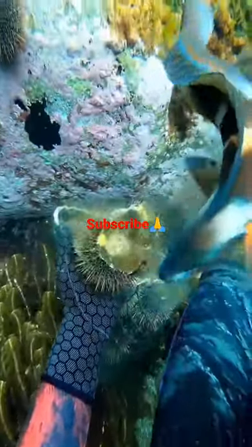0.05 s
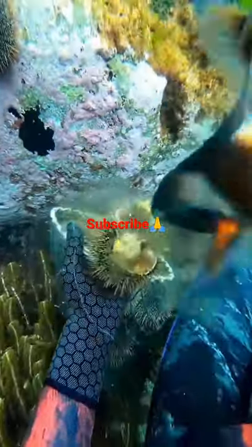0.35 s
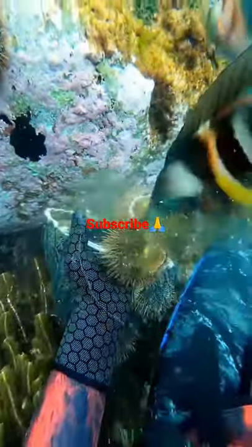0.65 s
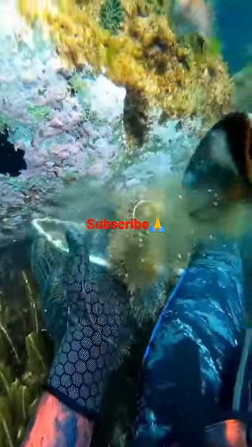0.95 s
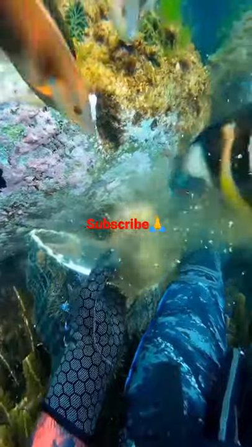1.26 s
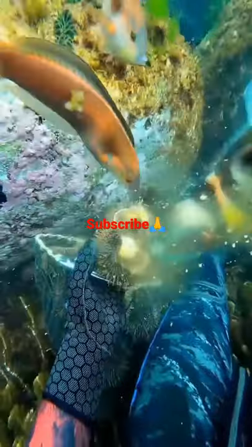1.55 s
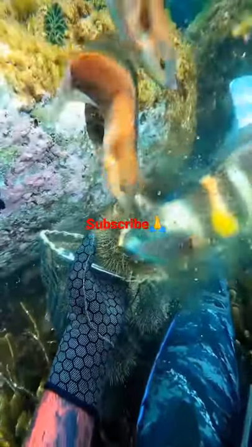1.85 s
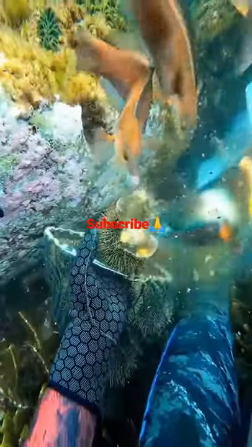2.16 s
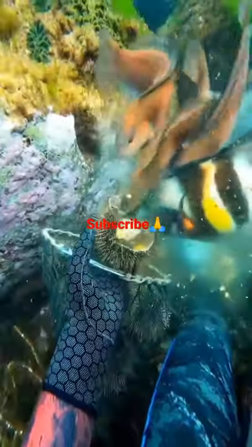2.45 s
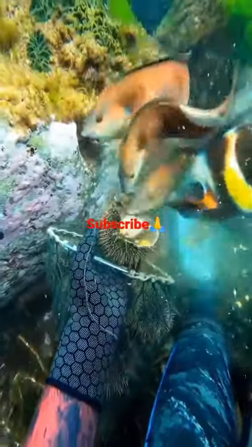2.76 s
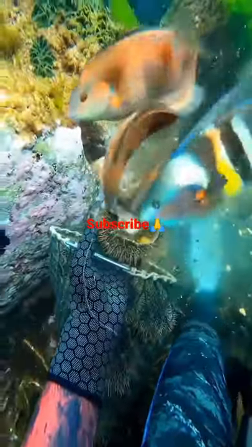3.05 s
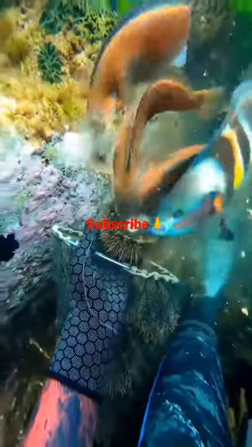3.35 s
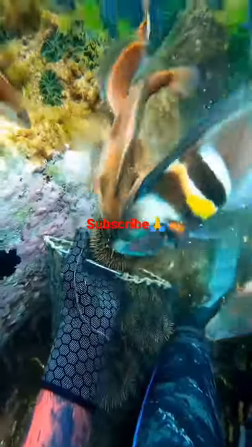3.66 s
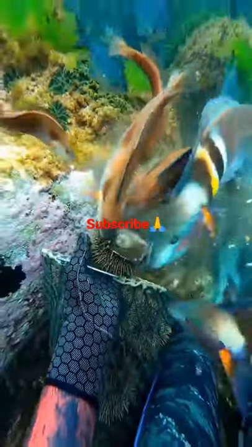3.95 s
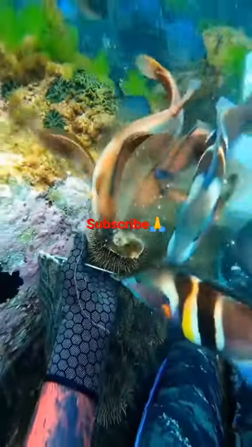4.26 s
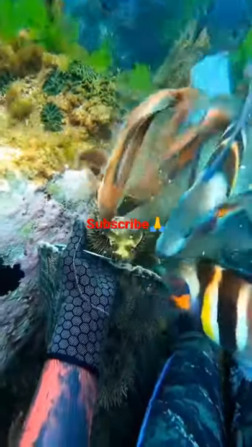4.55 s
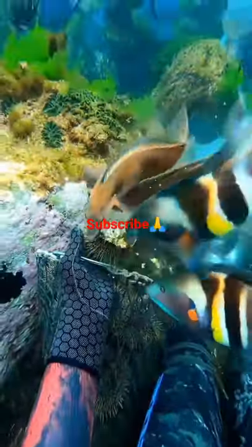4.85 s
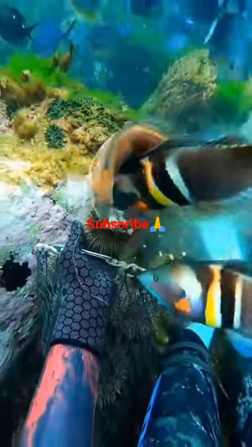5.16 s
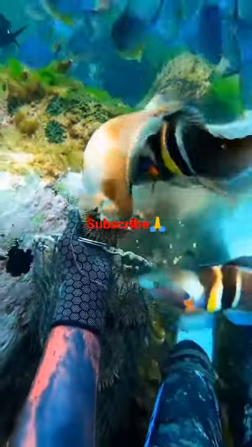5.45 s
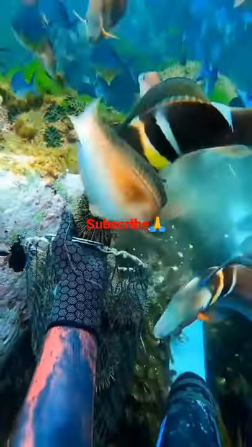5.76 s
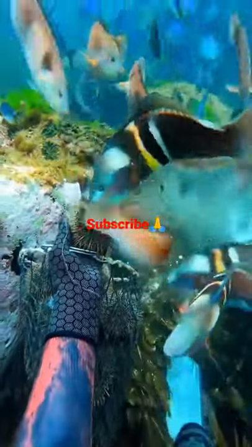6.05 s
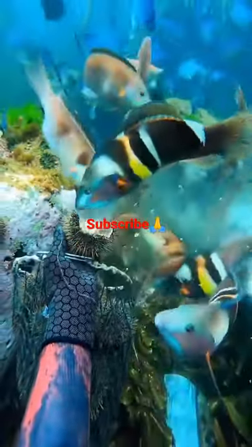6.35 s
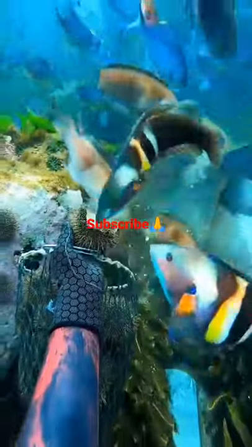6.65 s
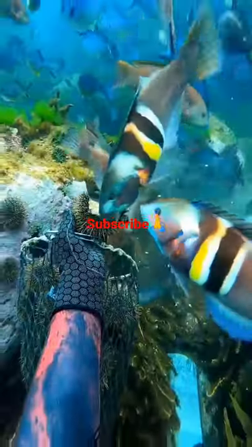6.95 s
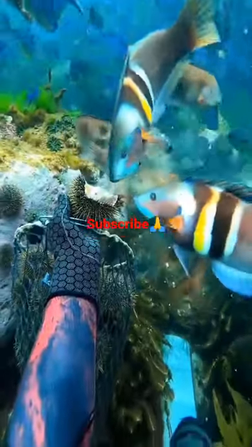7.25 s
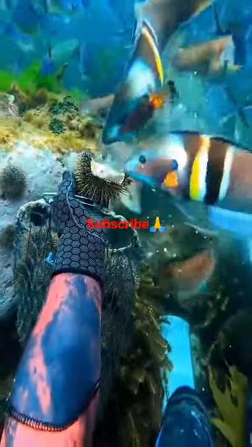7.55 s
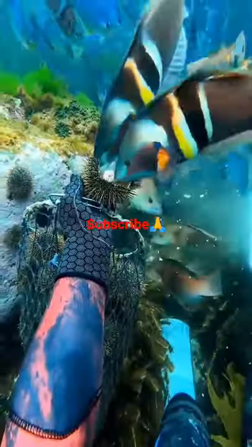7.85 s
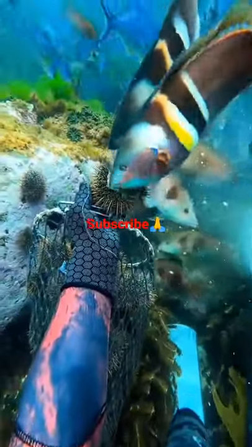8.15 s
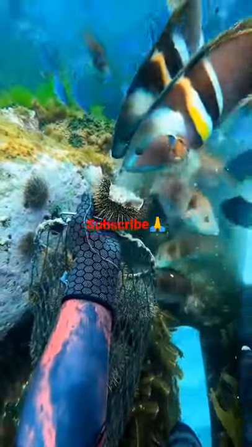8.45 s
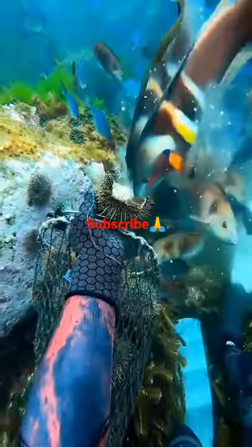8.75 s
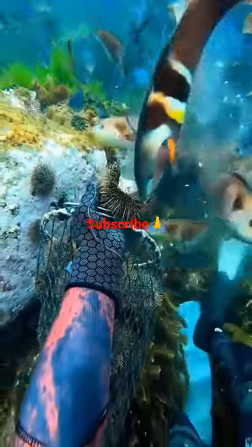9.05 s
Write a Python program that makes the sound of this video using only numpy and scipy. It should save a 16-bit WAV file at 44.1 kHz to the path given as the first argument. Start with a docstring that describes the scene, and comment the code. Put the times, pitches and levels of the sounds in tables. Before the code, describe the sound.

Underwater, sea urchin shell and spines click and crunch amid hollow knocks and soft thumps, over a low water rumble and faint crackle.

```python
"""Brittle clicks and crunches, hollow knocks and soft thumps sound under water, over a rumble and a crackle.
Wrasse crowd round a sea urchin that a diver has opened with a metal tool above a mesh bag.
Shell, spines and tool click by impact and crunch by brittle fracture; knocks and swirls excite
the damped modes of the camera housing. Moving water presses on the housing as a rumble,
and the countless tiny snaps of the reef add up to a crackle all around."""
import sys
import numpy as np
from scipy import signal
from scipy.fft import rfft, irfft, next_fast_len
from scipy.io import wavfile
from scipy.ndimage import uniform_filter1d, map_coordinates

SR = 44100
rng = np.random.default_rng(int(sys.argv[2]) if len(sys.argv) > 2 else 0)


def wav_out(sig):
    """Save sig, one row per channel (or a flat mono array), as 16-bit PCM at SR to the path in sys.argv[1]."""
    wavfile.write(sys.argv[1], SR, np.round(np.clip(np.atleast_2d(sig).T, -1, 1) * 32767).astype(np.int16))


N = 401751
T = np.arange(SR // 5) / SR  # time axis of one short event, in seconds
SNAP_T60_S = 0.01  # decay of a single crack, in shell or reef

# hard knocks on the housing: start_s, level_db, boom_db, clack_db
KNOCK_EVENTS = [(0.579, -15, 7, -0.5), (0.869, -33.5, 12, -5), (0.9537, -14, 6.5, -3.5),
                (4.049, -23.5, -1, -5), (4.235, -25.5, 1.5, -21), (4.532, -30, -31, 6),
                (5.153, -37, 15.5, -29), (5.332, -31, 5, -34), (6.012, -23.5, 3, -16),
                (6.7463, -11, -1.5, -13.5), (6.877, -23.5, -5.5, -26), (6.901, -29.5, 3.5, -2.5),
                (8.679, -28, 0, -20), (8.948, -17, -8.5, -7)]
# soft thumps of fins and glove: start_s, level_db, pitch_hz
THUMP_EVENTS = [(0.294, -21, 93), (0.717, -23.5, 113), (1.052, -29.5, 144), (1.646, -26.5, 97),
                (1.785, -25.5, 208), (2.494, -28, 188), (2.53, -26, 121), (2.62, -32, 170),
                (2.921, -32, 192), (3.056, -33, 182), (3.348, -26, 180), (3.658, -23, 107),
                (3.719, -23, 172), (4.001, -32, 131), (4.026, -21.5, 91), (4.275, -35, 177),
                (4.319, -37, 148), (4.776, -19, 102), (5.149, -17, 106.5), (5.286, -27.5, 165),
                (5.379, -28, 136), (5.723, -14.5, 104.5), (6.18, -24, 135), (6.229, -17.5, 117),
                (6.425, -19.5, 139), (6.602, -23.5, 129.5), (7.008, -26.5, 122), (7.41, -32.5, 145),
                (7.567, -29.5, 120), (7.709, -22.5, 123), (7.915, -21.5, 147), (7.951, -17, 98),
                (8.144, -24, 130), (8.425, -23.5, 124), (8.482, -26, 137), (8.557, -31.5, 142.5),
                (8.996, -21, 101)]
# spectrum of tiny fractures and grit: frequency_hz, gain_db
CRACKLE_SPECTRUM = [(410, -19), (700, -12.5), (1000, -11), (1150, 5.5), (1450, 7), (1860, -7), (2160, -1),
                    (2480, -3.5), (3290, 6.5), (4770, 0), (6270, -4), (7000, -11), (8640, -16.5),
                    (13000, -25)]
# spectrum of a hard contact: frequency_hz, gain_db
CLACK_SPECTRUM = [(300, 2.5), (600, 15.5), (950, -6), (1550, 4.5), (2100, -12.5), (2900, -3), (4000, -10),
                  (9000, -47)]


def click(db, pitch_hz, edge_db):
    """Impulse response: a snap rings its fragment and scatters off rock; small pieces have less body."""
    # spectrum of snapping shell: frequency_hz, gain_db
    shell_spectrum = [(500, -18), (950, -26), (1250, -8), (1600, -18.5), (2100, -6.5), (2600, 2),
                      (3400, 10.5), (4000, 7), (5500, 9), (6800, -9), (9000, -16.5), (13000, -28)]
    attack_s = 0.0008
    scatter = amp(-14) * fade(T, t60=0.1)
    envelope = (fade(T, SNAP_T60_S) + scatter) * (1 - np.exp(-T / attack_s))
    force = envelope * rng.standard_normal(len(T))
    add(force, attack_s, amp([-3.5]))  # the first crack, one sample long
    body_db = 11 - 21 * np.log2(pitch_hz / 3250)
    tilt = [(1600, body_db), (2600, 0), (3600, 0), (5500, -8.5 + 0.79 * edge_db), (8000, -6 + edge_db)]
    colour = lambda hz: along(shell_spectrum, hz) + along(tilt, hz) + 4 * bump(hz, pitch_hz, 310)
    return amp(db - 13.5) * burst(coloured(force, colour))


def clicks():
    """Brief impacts have broad spectra: shell, spines and tool click, each with its own brightness."""
    # sharp clicks: start_s, level_db, pitch_hz, treble_db
    click_events = [(0.226, -24, 3170, -45.5), (0.436, -16.5, 3400, -37.5), (0.5073, -23.5, 2970, -53),
                    (0.6744, -23, 3140, -53), (0.823, -26.5, 3560, -55), (0.8837, -24, 3560, -44),
                    (1.0867, -24, 2840, -33), (1.7674, -26.5, 3000, -68), (1.8083, -25, 3640, -57),
                    (2.4976, -26.5, 4800, -52), (2.5011, -17.5, 3420, -45), (2.5912, -14, 2700, -41),
                    (2.74, -26, 3700, -54), (2.912, -19, 2850, -39), (2.98, -25.5, 2740, -42),
                    (3.3386, -18.5, 2970, -53), (3.7376, -29, 2890, -44), (3.8431, -20.5, 3580, -46),
                    (3.888, -21.5, 3220, -44), (3.9784, -23.5, 4300, -40), (4.095, -25.5, 4600, -52),
                    (4.292, -16, 2770, -50), (4.293, -13.5, 3620, -48), (4.3388, -23, 3000, -57),
                    (4.439, -18.5, 3360, -41.5), (4.67, -27.5, 2520, -33), (4.8238, -21.5, 3650, -58),
                    (4.862, -25.5, 3430, -58), (4.892, -22, 2950, -55), (4.981, -21.5, 3530, -57),
                    (5.0622, -23, 2930, -64), (5.5582, -21, 2440, -58), (5.6184, -20, 2260, -58),
                    (5.676, -24, 2830, -43), (5.959, -22, 4400, -39), (6.105, -23, 2660, -88),
                    (6.423, -28, 4570, -41), (6.729, -19, 3060, -41.5), (6.9902, -20, 5240, -33),
                    (7.2074, -20, 3320, -50), (7.486, -30, 3240, -58), (7.9936, -21, 3060, -51),
                    (8.177, -17.5, 2600, -61), (8.2762, -20, 2740, -41), (8.486, -20, 2560, -53),
                    (8.5842, -24, 3020, -58), (8.906, -26, 3500, -43), (8.929, -30, 3000, -60),
                    (8.9533, -27.5, 3120, -54)]
    out = np.zeros(N)
    for s, db, pitch_hz, treble_db in click_events:
        edge_db = treble_db - db + 31  # zero for a click of typical brightness
        add(out, s, click(db, pitch_hz, edge_db))
    return out


def crunches():
    """Brittle fracture in a quick run: fine spines go quietly and brightly, thick shell fast and dully."""
    # crunches of shell and spines: start_s, level_db
    crunch_events = [(0.104, -44), (1.786, -38.5), (2.992, -38), (3.849, -37), (5.734, -38), (6.6, -39.5),
                     (8.182, -35.5), (8.279, -38.5), (8.357, -43), (8.4873, -30)]
    out = np.zeros(N)
    for s, db in crunch_events:
        excess_db = db + 37.5  # above a typical crunch
        length_s = 0.051 * 2 ** (-excess_db / 13.5)
        top_hz = 4440 * 2 ** (-excess_db / 4.5)
        fractures = sparks(len(T), rate=2700, spread_db=3) + 0.3 * rng.standard_normal(len(T))
        fractures *= np.exp(-2 * (T / length_s) ** 2)
        tilt = lambda hz: 4 * np.log2(1 + hz / 3000) - 10 * np.log10(1 + (hz / top_hz) ** 8)
        # the hollow shell resonates more the harder it breaks
        hollow = lambda hz: 3.5 * max(excess_db, 0) * bump(hz, 2680, 970)
        colour = lambda hz: along(CRACKLE_SPECTRUM, hz) + tilt(hz) + hollow(hz)
        add(out, s, amp(db) * burst(coloured(fractures, colour)))
    return out


def bites():
    """Jaws on shell excite damped modes: a hollow, falling double clack, its lowest ring 5 ms late."""
    # bites: start_s, level_db
    bite_events = [(2.2162, -23), (2.3447, -24), (8.9475, -26.5), (8.963, -31.5)]
    # modes of a bite: frequency_hz, level_db, t60_s, delay_s
    jaw_modes = [(2450, -4.5, 0.022, 0.00016), (1370, 2.5, 0.032, 0.00083), (637, -1, 0.029, 0.005),
                 (2950, -10, 0.027, 0.0049)]
    glide = 1 + 0.096 * fade(T, t60=0.15)  # the ring starts sharp and falls
    out = np.zeros(N)
    for s, db in bite_events:
        tone = sum(amp(level + rng.normal(0, 0.8)) * ring(T - delay, hz * glide, t60, attack=0.00019)
                   for hz, level, t60, delay in jaw_modes)
        add(out, s, amp(db - 6.5) * (burst(tone) + 0.25 * contact_noise(t60=0.26)))
    return out


def ticks():
    """Light impacts of grit, chips and shell each excite one hollow mode, with a rasp at contact."""
    # light taps: start_s, level_db, pitch_hz
    tick_events = [(4.823, -31.5, 477), (6.852, -34.5, 635), (6.88, -32, 1230), (6.961, -31, 1270),
                   (8.158, -27, 620), (8.178, -26, 2550), (8.486, -21.5, 2700), (8.951, -30.5, 678)]
    out = np.zeros(N)
    for s, db, hz in tick_events:
        rasp = amp(-6) * contact_noise(t60=0.055)
        tone = burst(ring(T, hz, t60=0.032, attack=0.0018))
        add(out, s, amp(db - 9.5) * (tone + rasp))
    return out


def brushes():
    """Spines brush glove and mesh in a swell of micro-impacts; the finer the spines, the brighter."""
    # brushes: centre_s, level_db, tilt_db_per_octave
    brush_events = [(0.915, -47.5, 2), (4.258, -44, 2), (5.411, -52, 6), (5.471, -49, 4), (6.076, -44, 0),
                    (6.182, -50, 4), (6.352, -51, 4), (7.079, -56, 3), (7.753, -46, -1), (8.007, -42, 3),
                    (8.795, -45, -1.5)]
    out = np.zeros(N)
    for s, db, tilt in brush_events:
        grains = sparks(len(T), rate=3000, spread_db=-2.5) * bump(T, T.mean(), width=0.011)
        colour = lambda hz: along(CRACKLE_SPECTRUM, hz) + tilt * np.log2(np.maximum(hz, 1000) / 4000)
        add(out, s - T.mean(), amp(db) * burst(coloured(grains, colour)))
    return out


def knocks():
    """Modal vibration: a hard contact clacks, the housing booms just after and the whole camera rocks."""
    # modes of the housing: frequency_hz, level_db, t60_s
    housing_modes = [(200, 2, 0.026), (285, -22, 0.045), (453, -4, 0.018), (610, -17, 0.018),
                     (902, -11, 0.0097)]
    out = np.zeros(N)
    for s, db, boom_db, clack_db in KNOCK_EVENTS:
        weight = lambda hz: amp(along([(200, boom_db), (450, 0.0072)], hz))
        detunes = 1 + 0.02 * rng.standard_normal(len(housing_modes))
        boom = sum(amp(level) * weight(hz) * ring(T - 0.0015, hz * detune, t60, attack=0.0041)
                   for (hz, level, t60), detune in zip(housing_modes, detunes))
        clack = amp(clack_db - 6) * contact_noise(t60=0.022)
        rocking = amp(-3) * ring(T, hz=72, t60=0.16, attack=0.0083)
        add(out, s, amp(db) * (4.52 * boom + clack + rocking))
    return out


def thumps():
    """Heavily damped oscillation: a soft push of water swings the housing for two or three cycles."""
    out = np.zeros(N)
    for s, db, hz in THUMP_EVENTS:
        swing = ring(T, hz, t60=0.048, attack=0.01)
        wall = ring(T, rng.uniform(157.7, 276.0), t60=0.04, attack=0.013)
        add(out, s, amp(db - 1.5) * burst(swing + 0.5 * wall))
    return out


def scrapes():
    """Stick-slip friction on the water-damped housing: soft scrapes slosh, hard ones ring and rattle."""
    # wet scrapes of glove, bag and feeding fish: start_s, level_db, length_s, centre_hz
    scrape_events = [(0.728, -44, 0.087, 470), (1.639, -45.5, 0.053, 576), (4.25, -33.5, 0.015, 467),
                     (4.275, -33.5, 0.043, 456), (4.372, -42, 0.037, 1310), (5.359, -45.5, 0.16, 580),
                     (7.966, -43.5, 0.074, 540), (8.143, -40, 0.035, 613)]
    out = np.zeros(N)
    for s, db, length_s, centre_hz in scrape_events:
        slips = sparks(len(T), rate=850, spread_db=4.5) * np.exp(-2 * (T / length_s) ** 2)
        q = 2 * 2 ** ((db + 43) / 5)  # the quality factor doubles every 5 dB
        resonance = lambda hz: -10 * np.log10(1 + (q * (hz / centre_hz - centre_hz / (hz + 1))) ** 2)
        lowpass = lambda hz: -10 * np.log10(1 + (hz / (1.5 * centre_hz)) ** 4)
        add(out, s, amp(db) * burst(coloured(slips, lambda hz: resonance(hz) + lowpass(hz))))
    return out


def wakes(blows):
    """Envelope of the eddies shed just after each blow: stronger after a harder one, up to a ceiling."""
    lag_s, ceiling_db = 0.024, -17
    out = np.zeros(N)
    for s, db, *_ in blows:
        add(out, s + lag_s - T.mean(), amp(min(db, ceiling_db) - 24) * bump(T, T.mean(), width=0.04))
    return out


def water():
    """Turbulent pressure on the housing: flow and surges add in power as a rumble; wakes gurgle higher."""
    # steady flow past the housing: time_s, level_db
    flow_levels = [(0, -27), (2.2, -30), (5.5, -28.5), (7.15, -33.5), (7.7, -31), (9.11, -29.5)]
    # surges of water: centre_s, level_db
    surges = [(0.02, -16.5), (0.35, -29), (0.68, -22.5), (1.07, -29), (1.65, -26), (2.98, -27),
              (4.03, -22.5), (4.31, -25.5), (4.88, -21.5), (5.3, -21.5), (6.03, -24.5), (6.748, -19),
              (7.48, -24.5), (8.5, -33.5), (9.0, -24)]
    # spectrum of the rumble: frequency_hz, gain_db
    rumble_spectrum = [(11, -26.5), (18, 9.5), (50, -0.5), (199, -23.5), (341, -39.5), (450, -37.5),
                       (739, -47), (1300, -57), (2200, -120)]
    # spectrum of the eddies: frequency_hz, gain_db
    eddy_spectrum = [(50, -5.5), (120, 3), (230, -2.5), (350, -15), (1500, -48.5)]
    t = np.arange(N) / SR
    surge_power = sum((amp(db) * bump(t, s, width=0.064)) ** 2 for s, db in surges)
    push = np.sqrt(amp(curve(flow_levels)) ** 2 + surge_power)
    swell = amp(1.5 * wobble(rate=8))
    rumble = unit(swell * coloured(rng.standard_normal(N), lambda hz: along(rumble_spectrum, hz)))
    eddies = unit(coloured(rng.standard_normal(N), lambda hz: along(eddy_spectrum, hz)))
    stir = wakes(KNOCK_EVENTS) + wakes(THUMP_EVENTS) + amp(-54)
    gurgle = amp(3.6 * wobble(rate=24))
    return push * rumble + stir * gurgle * eddies


def reef():
    """Superposition: countless snaps merge into a fizz; nearer spots crackle in short, pitched sprays."""
    # crackle of reef and stirred grit: time_s, level_db
    grit_levels = [(0, -52), (0.94, -57), (2.4, -53), (7.7, -52.5), (9.11, -54)]
    colour = lambda hz: along(CRACKLE_SPECTRUM, hz)
    fizz = unit(coloured(amp(1.8 * wobble(rate=16)) * rng.standard_normal(N), colour))
    spray_envelope = fade(T, t60=0.09) * (1 - np.exp(-T / 0.003)) + 2.5 * fade(T, SNAP_T60_S)
    impulse = 1.0 * (T == 0)
    sprays = np.zeros(N)
    for pitch_hz in np.geomspace(2000, 9000, 7):
        onsets = np.abs(sparks(N, rate=5, spread_db=3))
        strength = signal.oaconvolve(onsets, spray_envelope)[:N]
        grain = coloured(impulse, lambda hz: colour(hz) + 9 * bump(np.log(hz + 1), np.log(pitch_hz), 0.24))
        sprays += signal.oaconvolve(strength * sparks(N, rate=2200, spread_db=4), grain)[:N]
    return amp(curve(grit_levels)) * (amp(-2) * fizz + amp(-1) * unit(sprays))


def contact_noise(t60):
    """A hard contact radiates a broadband transient: decaying noise with the spectrum of a clack."""
    noise = rng.standard_normal(len(T)) * fade(T, t60)
    return burst(coloured(noise, lambda hz: along(CLACK_SPECTRUM, hz)))


def ring(t, hz, t60, attack):
    """A damped mode, silent before t = 0; t60 and attack in seconds."""
    t = np.maximum(t, 0)
    return np.sin(2 * np.pi * hz * t) * fade(t, t60) * (1 - np.exp(-t / attack))


def fade(t, t60):
    """Exponential decay, by 60 dB in t60 seconds."""
    return np.exp(-np.log(1000) * t / t60)


def sparks(length, rate, spread_db):
    """A Poisson process: on average rate impulses a second, random in sign and size."""
    present = rng.random(length) < rate / SR
    signs = rng.choice([-1, 1], length)
    return present * signs * amp(spread_db * np.minimum(rng.exponential(size=length), 2.5))


def wobble(rate):
    """A smooth random curve, rate knots a second."""
    return map_coordinates(rng.standard_normal(int(N * rate / SR) + 4), [np.arange(N) * rate / SR])


def coloured(x, gain_db):
    """Minimum-phase filter with the given dB response, so that nothing rings before its cause."""
    m = 2 * next_fast_len(x.shape[-1])
    gain = amp(np.maximum(gain_db(np.fft.rfftfreq(m, 1 / SR)), -120))
    cepstrum = irfft(np.log(gain), m)
    cepstrum[1:m // 2] *= 2
    cepstrum[m // 2 + 1:] = 0
    return irfft(rfft(x, m) * np.exp(rfft(cepstrum)), m)[..., :x.shape[-1]]


def along(points, hz):
    """Interpolate (frequency_hz, value) points on a log axis."""
    frequencies, values = np.transpose(points)
    return np.interp(np.log(hz + 1), np.log(frequencies + 1), values)


def curve(rows):
    """One value per sample from (time_s, value) rows."""
    return np.interp(np.arange(N) / SR, *np.transpose(rows))


def bump(x, centre, width):
    """A Gaussian peak of height 1, down to 1/e at width from its centre."""
    return np.exp(-((x - centre) / width) ** 2)


def amp(db):
    """Decibels to gain."""
    return 10 ** (np.asarray(db) / 20)


def unit(x):
    """Scale to rms 1."""
    return x / np.sqrt(np.mean(x ** 2) + 1e-20)


def burst(x):
    """Scale a short sound to rms 1 over its loudest 4 ms."""
    return x / np.sqrt(uniform_filter1d(x ** 2, size=176).max())


def add(track, s, x):
    """Mix a short sound in at s seconds."""
    part = track[max(round(s * SR), 0):][:len(x)]
    part += x[:len(part)]


def scene():
    """Structure-borne sound: the housing feeds both microphones alike; only the treble differs a little."""
    # treble resonances of the housing, which colour every snap: centre_hz, width_hz, gain_db
    case_resonances = [(1847, 67, 11), (2540, 146, 9), (2887, 190, 6)]
    # spectrum of the side signal: frequency_hz, gain_db
    side_spectrum = [(3000, -73), (3900, -40.5), (5500, -12), (12000, -13.5)]
    case_db = lambda hz: sum(db * bump(hz, centre, width) for centre, width, db in case_resonances)
    bright = coloured(reef() + clicks() + crunches() + brushes(), case_db)
    mid = bright + water() + thumps() + knocks() + scrapes() + bites() + ticks()
    side = coloured(bright * wobble(rate=500), lambda hz: along(side_spectrum, hz))
    return np.array([mid + side, mid - side])


def record(dry):
    """Band limiting: the camera keeps nothing above its cutoff."""
    cutoff_hz = 13300
    m = next_fast_len(N + SR // 2)
    passband = np.fft.rfftfreq(m, 1 / SR) < cutoff_hz
    return irfft(rfft(dry, m) * passband, m)[:, :N]


dry = scene()
out = record(dry)
wav_out(out)
```